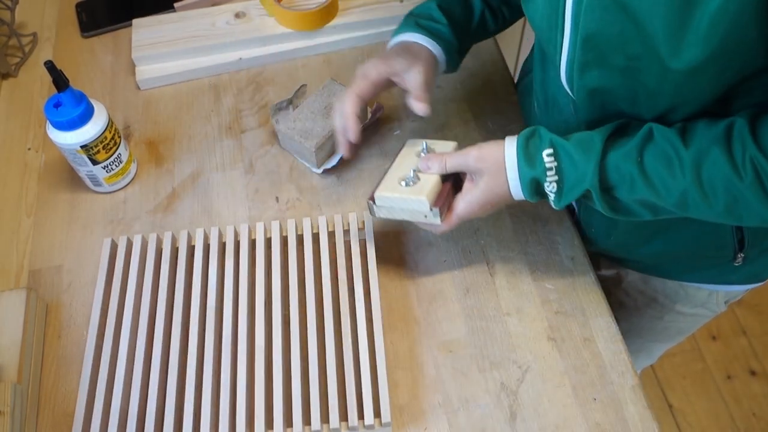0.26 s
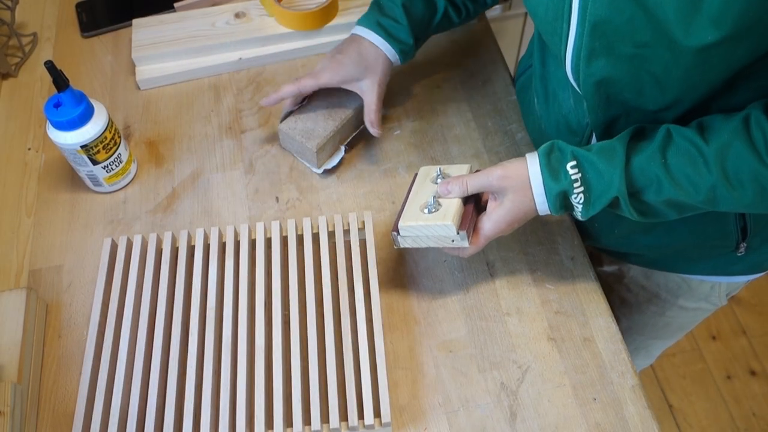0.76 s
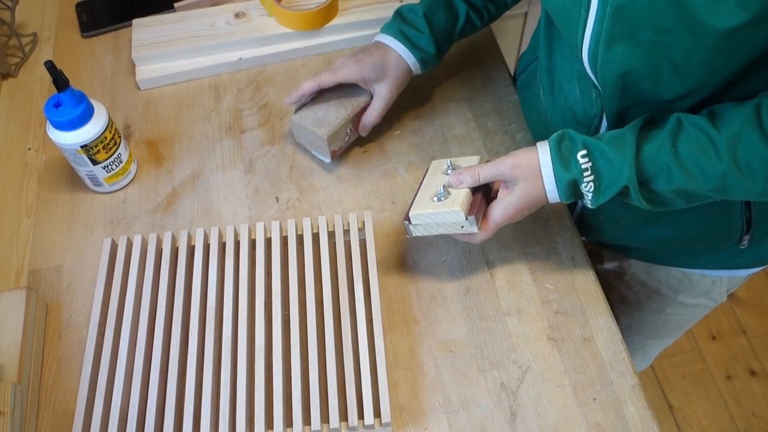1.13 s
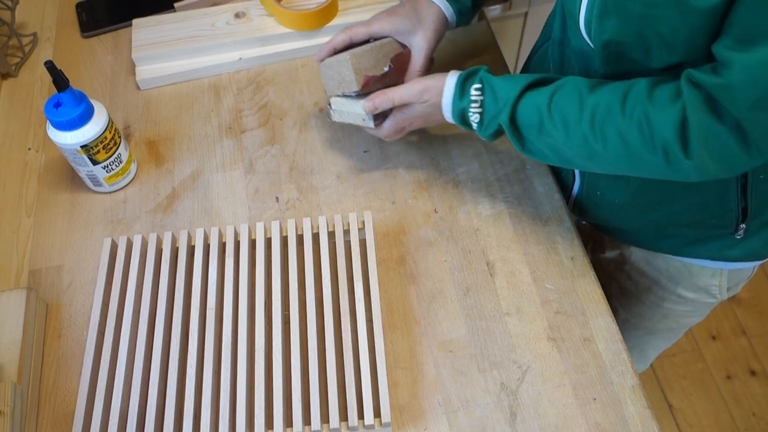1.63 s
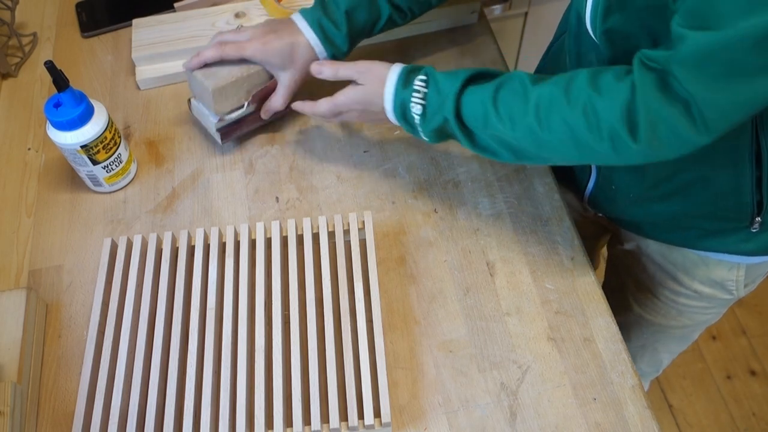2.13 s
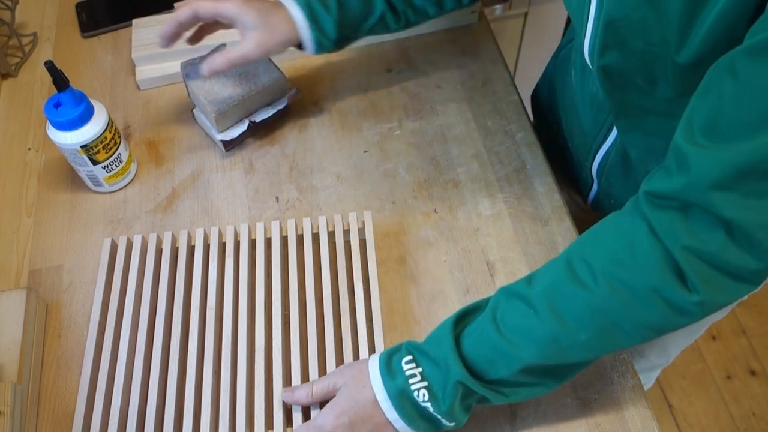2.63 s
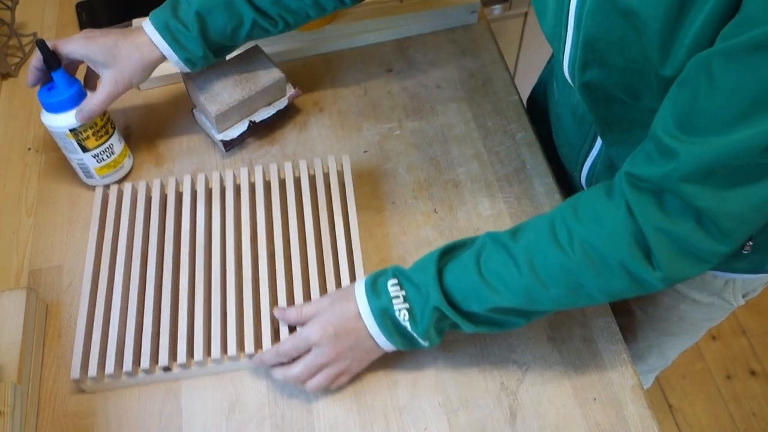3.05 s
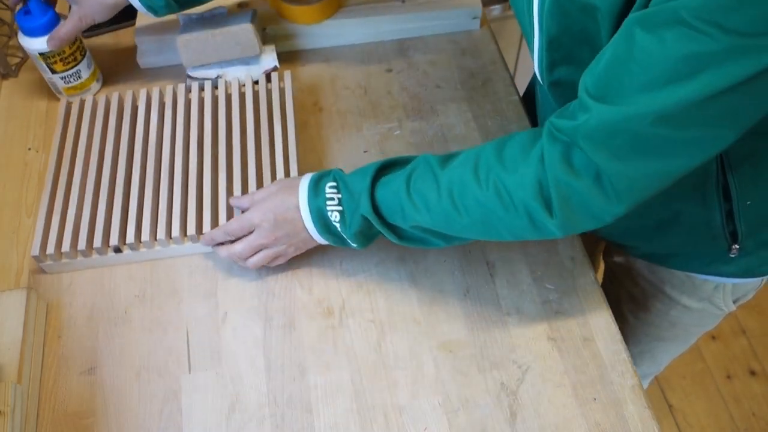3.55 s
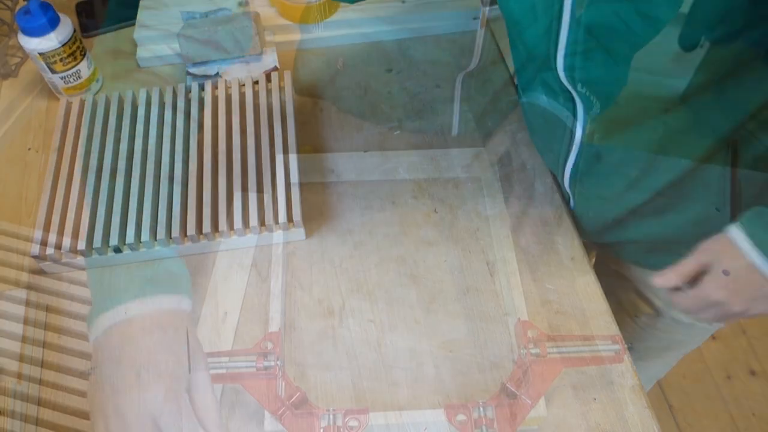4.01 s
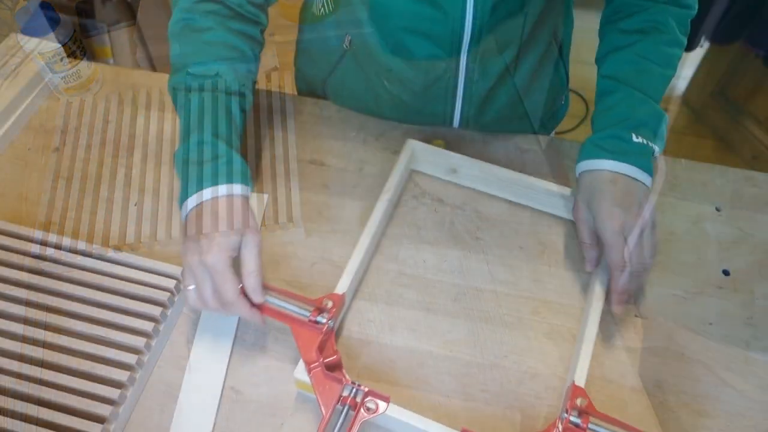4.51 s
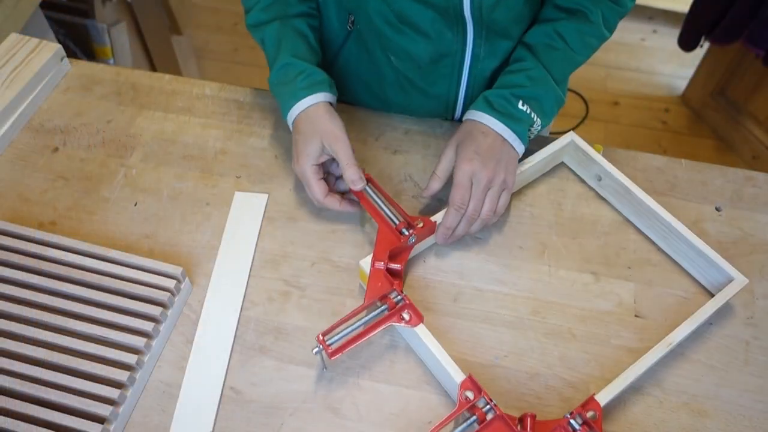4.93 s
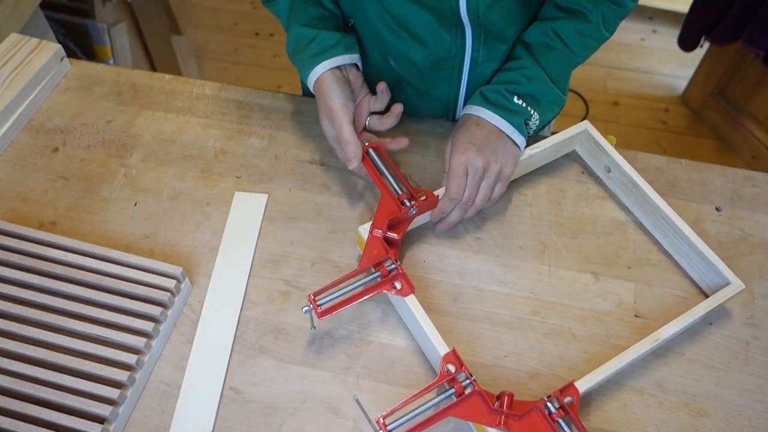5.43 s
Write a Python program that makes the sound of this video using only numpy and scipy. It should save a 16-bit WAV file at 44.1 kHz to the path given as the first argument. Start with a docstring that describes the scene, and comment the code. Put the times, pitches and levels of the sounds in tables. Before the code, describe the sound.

Close stereo sound at a wooden workbench in a small room with short echoes and faint steady hush. First come light abrasive wipes and dry clacks, then a heavy knock. Slats are pushed with a loud juddering scrape of over half a second. Finally, slightly right, a clamped frame drags coarsely, bumps, and gives bright metallic clinks.

```python
"""A wooden frame held in metal corner clamps is dragged round on a bench, knocking, its clamp screws clinking.
Before it, sanding blocks are wiped and put down, and a grille of thin slats is pushed, rasping and juddering.
Small workshop, two microphones: blocks and grille lie a little to the left, the frame a little to the right.
Rubbing is made of tiny random slips that ring a filtered body; blows are dying noise through wooden bodies
and decaying sines for the metal. Echoes and a steady hush make the room."""
import sys
import numpy as np
from scipy import signal
from scipy.fft import rfft, irfft
from scipy.io import wavfile

SR = 44100
rng = np.random.default_rng(int(sys.argv[2]) if len(sys.argv) > 2 else 0)


def wav_out(sig):
    """Save sig, one row per channel (or a flat mono array), as 16-bit PCM at SR to the path in sys.argv[1]."""
    wavfile.write(sys.argv[1], SR, np.round(np.clip(np.atleast_2d(sig).T, -1, 1) * 32767).astype(np.int16))


N = 250047
T = np.arange(N) / SR  # seconds


def from_db(db):
    """Decibels to gain."""
    return np.exp(np.asarray(db) * (np.log(10) / 20))


def rms_one(x):
    """Scale to rms 1."""
    return x / np.sqrt(np.mean(x ** 2) + 1e-20)


def gains(rows):
    """One gain curve for each dB column, practically silent outside the rows."""
    s, *columns = np.transpose(rows)
    out = np.zeros((len(columns), N))
    span = slice(*np.searchsorted(T, [s[0], s[-1]]))
    out[:, span] = [from_db(np.interp(T[span], s, column)) for column in columns]
    return out + 1e-12


def through(x, response):
    """Pass a signal through an impulse response."""
    return signal.oaconvolve(x, response)[:len(x)]


def cut(x, hz, kind, order=2):
    """Butterworth filter."""
    edges = np.clip(hz, 10, .45 * SR)
    return signal.sosfilt(signal.butter(order, edges, kind, fs=SR, output="sos"), x)


def body(colour, modes=(), size=8192):
    """Causal impulse response of a broad colour with resonances on top."""
    hz = np.arange(size // 2 + 1) * SR / size
    points = np.array(colour)
    db = np.interp(np.log(hz + 1), np.log(points[:, 0]), points[:, 1])
    # resonances lift the power
    lift = 1 + sum((from_db(2 * up) - 1) / (1 + (2 * (hz - centre) / width) ** 2)
                   for centre, width, up in modes)
    # folding the cepstrum gives minimum phase: the body answers at once
    cepstrum = irfft(np.log(from_db(db) * np.sqrt(np.maximum(lift, 1e-2))))
    cepstrum[1:size // 2] *= 2
    cepstrum[size // 2 + 1:] = 0
    return irfft(np.exp(rfft(cepstrum)))


def drift(rate):
    """Smooth chance with spread 1, changing about rate times a second."""
    return rms_one(np.interp(T * rate, np.arange(N), rng.standard_normal(N)))


def dying_noise(t60, size=16384):
    """Countless overlapping modes or echoes fading together, 60 dB in t60 seconds; energy 1."""
    tail = rng.standard_normal(size) * from_db(-60 * T[:size] / t60)
    return tail / np.linalg.norm(tail)


def add(out, s, sound):
    """Mix a sound in at a time in seconds."""
    at = max(round(s * SR), 0)
    out[at:at + len(sound)] += sound[:N - at]


def blow(sound, db):
    """Give a blow the energy of one millisecond at this level."""
    return from_db(db) * sound * np.sqrt(SR / 1000) / np.linalg.norm(sound)


def stroke(s, length_s, rise, fall, sag=0):
    """Gain of one hand movement: it swells, holds or sags, and dies away; slopes in dB per second."""
    swell = -rise * np.maximum(s - T, 0)
    hold = -sag * np.clip(T - s, 0, length_s)
    fade = -fall * np.maximum(T - s - length_s, 0)
    return from_db(np.maximum(swell + hold + fade, -200))


def strokes(rows, rise, fall):
    """Like movements, the strongest prevailing: one gain curve for each dB column."""
    out = 0
    for s, length_s, *db in rows:
        out = np.maximum(out, from_db(db)[:, None] * stroke(s, length_s, rise, fall))
    return out


def friction(per_s, spread_db, hiss_db, chatter_db, chatter_rate):
    """Fibres catch and let go: uneven tiny slips over a fine hiss, bunched as the part chatters."""
    sizes = from_db(spread_db * np.minimum(rng.exponential(1, N), 4)) * rng.choice([-1, 1], N)
    slips = rms_one(sizes * (rng.random(N) < per_s / SR))
    hiss = from_db(hiss_db) * rng.standard_normal(N)
    return (slips + hiss) * from_db(chatter_db * drift(chatter_rate))


def slide(slips, response, rumble, rasp, grit, low_hz, high_hz):
    """Slips ring a body: weight brings out its rumble, speed its rasp, dust its grit."""
    x = through(slips, response)
    low = cut(x, low_hz, "low", order=4)
    middle = cut(x, [low_hz, high_hz], "band", order=4)
    high = cut(x, high_hz, "high", order=4)
    return rms_one(low) * rumble + rms_one(middle) * rasp + rms_one(high) * grit


def stick_slip(hz, width_hz):
    """Slips lock on to one resonance and make a wavering tone."""
    r = np.exp(-np.pi * width_hz / SR)
    resonance = [1, -2 * r * np.cos(2 * np.pi * hz / SR), r * r]
    tone = signal.lfilter([1, 0, -1], resonance, rng.standard_normal(N))
    flattened = np.tanh(2 * rms_one(tone))
    return rms_one(cut(flattened, [hz * .8, hz * 1.2], "band"))


def ringing(modes):
    """Fine slips keep a set of narrow resonances sounding."""
    slips, out = rng.standard_normal(N), 0
    for hz, width_hz, db in modes:
        out = out + from_db(db) * cut(slips, [hz - width_hz / 2, hz + width_hz / 2], "band", order=1)
    return rms_one(out)


# Hush of the empty workshop. Each row: frequency in Hz, relative level in dB per Hz.
HUSH_COLOUR = [(20, -42), (40, 5), (58, -4), (110, -4), (190, -12.5), (260, -8.5), (420, -10), (530, -15.5),
               (640, -9), (900, -8), (1080, -16.5), (1380, -17.5), (1560, -9), (2100, -14), (3500, -25),
               (6000, -29), (11000, -28.5), (16000, -24.5)]
# How far the two microphones disagree. Each row: frequency in Hz, side against mid in dB.
STEREO_WIDTH = [(60, -20), (140, -57), (300, -19), (1000, -10), (2200, -12.5), (4000, 1.5), (16000, -2.5)]
HUSH_DB = -51.5


def background():
    """Steady filtered noise, partly different at the two microphones."""
    mid, side = (rms_one(through(rng.standard_normal(N), body(HUSH_COLOUR))) for _ in range(2))
    side = through(side, body(STEREO_WIDTH))
    return from_db(HUSH_DB) * np.array([mid + side, mid - side])


ROOM_T60_S, ROOM_DB, EARLY_DB = 0.3, -7.5, 0


def workshop(x, early_t60=0.025, thin_hz=260):
    """Near surfaces and then the walls answer a blow; the echoes differ between the two microphones."""
    def echoes():
        # near surfaces answer after 1.25 ms, walls after 10 ms
        early = np.roll(np.pad(dying_noise(early_t60), (0, SR // 100)), SR // 800)
        late = np.pad(dying_noise(ROOM_T60_S), (SR // 100, 0))
        return from_db(EARLY_DB) * early + from_db(ROOM_DB) * late
    mid = x + through(x, cut(echoes(), thin_hz, "high"))
    side = through(x, through(echoes(), body(STEREO_WIDTH)))
    return np.array([mid + side, mid - side]) / np.sqrt(1 + from_db(2 * EARLY_DB) + from_db(2 * ROOM_DB))


SCRAPE_ROOM_DB = -6  # walls against the direct scrape


def moving(source, pan_db, lag_s):
    """A sliding part touches at many points, so part of its sound differs between the two microphones."""
    mid, side = source(), through(source(), body(STEREO_WIDTH))
    walls = cut(np.pad(dying_noise(ROOM_T60_S), (SR // 200, 0)), 310, "high")
    mid = mid + from_db(SCRAPE_ROOM_DB) * through(mid, walls)
    # from one side, long waves arrive late at the far microphone and short ones are shadowed
    hz = np.arange(N // 2 + 1) * SR / N
    delay = -1j * np.pi * hz * lag_s / (1 + (hz / 2500) ** 4)
    shadow = (from_db(pan_db / 2) - 1) * hz ** 2 / (hz ** 2 + 600 ** 2)
    side = side + irfft(rfft(mid) * (delay + shadow), N)
    return np.array([mid + side, mid - side])


# Colour of wood being rubbed. Each row: frequency in Hz, relative level in dB per Hz.
RUBBED_WOOD_COLOUR = [(88, -22), (150, -14), (244, -17), (376, -9), (439, -6), (1140, -14), (1940, 2),
                      (2650, 1), (3420, -0.5), (4760, -15.5), (6510, 0), (10200, 1.5), (16000, -8.5)]
# Resonances of a hand-sized block. Each row: frequency in Hz, width in Hz, lift in dB.
BLOCK_RESONANCES = [(465, 15, 1.6), (875, 51, 4.2), (2026, 25, 5), (2380, 90, 1.3), (3290, 330, 1.8)]
# Wipes of sanding blocks and hands over wood.
# Each row: start in seconds, length in seconds, rasp level in dB, grit against rasp in dB.
WIPE_STROKES = [(0.216, 0.022, -46.5, -2.5), (0.65, 0.21, -62, -9), (0.834, .03, -45, -1.5),
                (0.877, 0.062, -35, -1), (0.967, 0.094, -37, 0), (1.109, .025, -44.5, -3),
                (1.18, 0.36, -58, -3.5), (1.483, 0.012, -32, -7), (1.55, 0.012, -38, -4.5),
                (1.586, 0.037, -44.5, 0.5), (1.676, 0.12, -50.5, -3.5), (1.792, 0.076, -43.5, -7),
                (1.88, .15, -52.5, 1), (2.08, 0.31, -59, -2), (2.515, .008, -38.5, -18),
                (2.62, 0.09, -53, -4.5), (3.82, 0.087, -66, 5.5), (4.116, 0.2, -53, -9)]
WIPE_RISE_DB_PER_S, WIPE_FALL_DB_PER_S = 529, 336
# the block's hollow note: level at full rasp; share of the rasp's swing
WIPE_HOLLOW_DB, WIPE_HOLLOW_FOLLOWS = -30, 0.51


def sanding_blocks():
    """Abrasive paper brushes the bench and the other block; fingers brush the wood."""
    slips = friction(per_s=3000, spread_db=1.0, hiss_db=4.5, chatter_db=1.5, chatter_rate=90)
    rows = [(s, length_s, db, db + grit_db) for s, length_s, db, grit_db in WIPE_STROKES]
    rasp, grit = strokes(rows, WIPE_RISE_DB_PER_S, WIPE_FALL_DB_PER_S)
    hollow = from_db(WIPE_HOLLOW_DB) * rasp ** WIPE_HOLLOW_FOLLOWS
    wood = body(RUBBED_WOOD_COLOUR, BLOCK_RESONANCES)
    return slide(slips, wood, hollow, rasp, grit, low_hz=1170, high_hz=4700)


# Colour of a small struck block. Each row: frequency in Hz, relative level in dB per Hz.
STRUCK_BLOCK_COLOUR = [(100, -21), (400, -1.5), (900, -14.5), (1500, -9.5), (2400, 1.5), (3400, -15.5),
                       (5000, -24), (8000, -17.5), (16000, -31)]
# Blocks and slats clacking.
# Each row: time in seconds, level in dB before the common trim, extra edge in dB.
WOOD_CLACKS = [(0.191, -15, -12), (0.198, -16, -3), (0.863, -21.5, 24), (1.0724, -13, 34),
               (1.4735, -8.5, -15), (1.483, -8.5, -27), (1.489, -12, -10), (1.659, -19, 26),
               (2.226, -7.5, -42), (2.2325, -9, -24), (2.482, -28, -23), (4.349, -13, -20),
               (5.352, -22, -12), (5.441, -13.5, -17)]


def clacks(t60=0.011, edge_hz=5000, level_db=-2.56):
    """Small pieces of wood ring briefly; a sharp edge adds a tick."""
    out, block = np.zeros(N), body(STRUCK_BLOCK_COLOUR, BLOCK_RESONANCES)
    for s, db, edge_db in WOOD_CLACKS:
        ring = through(dying_noise(t60), block)
        tick = from_db(edge_db) * cut(ring, edge_hz, "high", order=1)
        add(out, s, blow(ring + tick, db + level_db))
    return out


# Colour of the bench top. Each row: frequency in Hz, relative level in dB per Hz.
BENCH_TOP_COLOUR = [(30, -19), (70, -7.5), (115, -14.5), (165, -0.5), (260, -10), (450, -1), (750, -3.5),
                    (1100, -6.5), (1600, -9), (2500, -11.5), (4000, -22), (9000, -24), (16000, -17)]
# Resonances of the bench top. Each row: frequency in Hz, width in Hz, lift in dB.
BENCH_RESONANCES = [(160, 66, 5), (205, 8.5, 7), (278, 30, 7.5), (380, 26, 3.5), (445, 20, 3), (620, 43, 2),
                    (760, 54, 3.5), (963, 49, 5.5), (1203, 68, 2), (1880, 120, -2)]
# Blows that shake the bench.
# Each row: time in seconds, level in dB before the common lift, contact hardness as a treble limit in Hz.
BENCH_THUDS = [(0.001, -5, 1530), (0.193, -31, 1520), (0.525, -37, 130), (1.475, -24.5, 2000),
               (2.236, 1, 4960), (2.246, -3, 3000), (2.258, -2, 3000), (2.273, -1, 3320), (2.297, -4, 3180),
               (2.48, -29, 900), (2.628, -22, 307), (2.915, -6.5, 300), (3.436, -8.5, 2500),
               (3.563, -18, 247), (4.294, -17, 253), (4.475, -16, 400), (4.5309, -11, 1500),
               (5.16, -3, 4000), (5.428, -11, 1190)]


def thuds(t60=0.19, level_db=3, push_db=-8):
    """One push and the bench top booms; a soft contact leaves out the treble."""
    out, bench = np.zeros(N), body(BENCH_TOP_COLOUR, BENCH_RESONANCES)
    for s, db, hard_hz in BENCH_THUDS:
        shake = dying_noise(t60)
        shake[0] += from_db(push_db)
        boom = cut(through(shake, bench), hard_hz, "low")
        add(out, s, blow(boom, db + level_db))
    return out


# Colour of the slatted grille. Each row: frequency in Hz, relative level in dB per Hz.
GRILLE_BODY_COLOUR = [(24, -69), (40, -20), (96, -17.5), (144, -2), (231, -8.5), (444, -8), (570, -13.5),
                      (715, -11), (1150, -18), (1480, -10.5), (1630, -8.5), (2500, -10), (4800, -43),
                      (7930, -33), (16000, -46.5)]
# Resonances of the slats. Each row: frequency in Hz, width in Hz, lift in dB.
SLAT_RESONANCES = [(144, 67, 4.9), (328, 30, 4.7), (458, 23, 8), (687, 20, 7), (1690, 39, 6),
                   (1854, 74, 7.3), (1920, 130, 8.3), (2340, 22, 8.5), (2514, 55, 5.3), (3224, 48, 8),
                   (3590, 40, 8.4), (4220, 250, 5.3)]
# Resonances of a glue bottle pushed along with the grille. Each row: frequency in Hz, width in Hz, relative
# level in dB.
BOTTLE_RESONANCES = [(1260, 21, 2), (1327, 26, 12.5), (1960, 14, -14), (2200, 29, 10.5), (2430, 9.4, -13),
                     (2520, 22, -17), (4140, 41, -16), (5320, 45, -22), (7650, 410, -13.5)]
# Slats catching and slipping in step. Each row: start in seconds, length in seconds, level in dB.
SLAT_JUDDERS = [(3.01, 0.056, -14), (3.17, 0.022, -12), (3.35, 0.033, -17)]
# Squeaks as the grille is gripped. Each row: start in seconds, length in seconds, level in dB.
GRIP_SQUEAKS = [(2.634, 0.0069, -35.5), (2.667, .011, -34)]
# one push of the grille: it gets up to speed, eases off steadily and stops
PUSH_START_S, PUSH_LENGTH_S, PUSH_DB = 2.8944, 0.62, -14.5
PUSH_RISE_DB_PER_S, PUSH_SAG_DB_PER_S, PUSH_FALL_DB_PER_S = 231, 6, 178
PUSH_RUMBLE_DB, PUSH_GRIT_DB = -6.5, -15.5  # against the rasp
# early in the push a glue bottle, shoved along with the grille, rings brightly
BOTTLE_START_S, BOTTLE_LENGTH_S, BOTTLE_DB, BOTTLE_FALL_DB_PER_S = 2.91, 0.092, -18, 110
JUDDER_HZ, JUDDER_WIDTH_HZ, JUDDER_RISE_DB_PER_S, JUDDER_FALL_DB_PER_S = 1658, 28, 160, 170
SQUEAK_HZ, SQUEAK_WIDTH_HZ, SQUEAK_FADE_DB_PER_S = 2110, 32, 1100


def grille():
    """Slat ends rasp over the bench and now and then judder in step."""
    slips = friction(per_s=1200, spread_db=1.5, hiss_db=0.5, chatter_db=1.9, chatter_rate=190)
    push = from_db(PUSH_DB) * stroke(PUSH_START_S, PUSH_LENGTH_S, PUSH_RISE_DB_PER_S,
                                     PUSH_FALL_DB_PER_S, PUSH_SAG_DB_PER_S)
    rumble, grit = push * from_db(PUSH_RUMBLE_DB), push * from_db(PUSH_GRIT_DB)
    slats = body(GRILLE_BODY_COLOUR, SLAT_RESONANCES)
    scrape = slide(slips, slats, rumble, push, grit, low_hz=1120, high_hz=4530)
    bearing = stroke(BOTTLE_START_S, BOTTLE_LENGTH_S, PUSH_RISE_DB_PER_S, BOTTLE_FALL_DB_PER_S)
    bottle = from_db(BOTTLE_DB) * bearing * ringing(BOTTLE_RESONANCES)
    judder_gain = strokes(SLAT_JUDDERS, JUDDER_RISE_DB_PER_S, JUDDER_FALL_DB_PER_S)[0]
    judder = judder_gain * stick_slip(JUDDER_HZ, JUDDER_WIDTH_HZ)
    squeak_gain = strokes(GRIP_SQUEAKS, SQUEAK_FADE_DB_PER_S, SQUEAK_FADE_DB_PER_S)[0]
    squeak = squeak_gain * stick_slip(SQUEAK_HZ, SQUEAK_WIDTH_HZ)
    return scrape + bottle + judder + squeak


# Modes of a clamp's body. Each row: frequency in Hz, level in dB, t60 in seconds, before the grip's chance.
CLAMP_BODY_MODES = [(1530, -9.5, 0.055), (1690, -1, 0.02), (1926, -6, .025), (2224, 3, 0.023),
                    (2470, -11.5, 0.023), (2840, -20, 0.047), (4030, -25, 0.026)]
# Modes of the clamp's loose handle, in the same columns: Hz, dB, seconds.
LOOSE_HANDLE_MODES = [(5830, -21, .015), (6840, -11, 0.018), (8500, -3, 0.016), (9950, 7, 0.022),
                      (9700, 17, 0.0083), (10200, 0, 0.028), (10460, 6, .02), (11000, -11, .015)]
# Clamp screws clinking.
# Each row: time in seconds, body level in dB, handle level in dB, both before the common trims.
SCREW_CLINKS = [(5.1535, -4, -13), (5.157, -3, -7.5), (5.1615, -1, -27), (5.2807, -1, -13.5),
                (5.2835, -3.5, -38), (5.3525, -11, -37), (5.441, -25, -30), (5.606, -36, -22),
                (5.611, -18, -17)]


def clinks(contact_s=0.012, contact_db=-3, crack_s=0.028, crack_db=-8, level_db=-4.5, size=8192):
    """Each touch cracks and rings clamp and handle; the grip shifts every mode's strength and pitch a little."""
    out, t = np.zeros(N), T[:size]
    for s, *levels in SCREW_CLINKS:
        for modes, db in zip((CLAMP_BODY_MODES, LOOSE_HANDLE_MODES), levels):
            # spreads: strength in dB, detuning as a fraction, phase in radians
            chance = rng.normal(0, (2.5, .015, 2), (len(modes), 3))
            ring = np.zeros(size)
            for (hz, level, t60), (up, detune, phase) in zip(modes, chance):
                fade = from_db(level + up - 60 * t / t60)
                ring += fade * np.sin(2 * np.pi * hz * (1 + detune) * t + phase)
            ring = ring * np.minimum(t * 3000, 1)  # onset of a third of a millisecond
            contact = from_db(contact_db) * through(ring, dying_noise(contact_s))
            add(out, s, blow(ring + contact, db + level_db))
        crack = cut(dying_noise(crack_s), [2500, 11000], "band", order=3)
        add(out, s, blow(crack, levels[1] + crack_db))
    return out


# Colour of the clamped frame. Each row: frequency in Hz, relative level in dB per Hz.
FRAME_BODY_COLOUR = [(24, -104), (40, -27), (96, -19.5), (140, 3), (243, -13.5), (283, -6), (585, -19),
                     (1040, -13.5), (1340, -16), (2440, -14.5), (3220, -26.5), (3740, -29.5), (4680, -30.5),
                     (9450, -24), (16000, -34)]
# Resonances of the frame. Each row: frequency in Hz, width in Hz, lift in dB.
FRAME_RESONANCES = [(141, 28, 6.8), (358, 240, 4.9), (710, 100, 6.4), (1020, 80, 2.1), (1500, 26, 9.9),
                    (1658, 84, 7), (2064, 63, 7.4), (1330, 82, 1.5), (2423, 92, 6.5), (2826, 61, 6.4),
                    (3730, 83, 10.3)]
# Resonances of the frame's rails. Each row: frequency in Hz, width in Hz, relative level in dB.
RAIL_RESONANCES = [(801, 30, 6.5), (1032, 36, 6.5), (1103, 11, 12.5)]
# The frame dragged round.
# Each row: time in seconds, the wood's rasp in dB, the bench's rumble in dB, the grit in dB.
DRAG_LEVELS = [(4.296, -34.5, -31, -49), (4.328, -27, -31.5, -41.5), (4.452, -30.5, -26.5, -39),
               (4.48, -17.5, -21, -29.5), (4.516, -26, -25.5, -41), (4.534, -24, -27, -35.5),
               (4.646, -23.5, -20.5, -38), (4.69, -22, -26, -32), (4.886, -21.5, -26, -36.5),
               (4.968, -25.5, -29.5, -42.5), (5.066, -19.5, -33, -28), (5.11, -17.5, -20.5, -36.5),
               (5.14, -39, -21, -38.5)]
# Last nudges as the frame is lined up.
# Each row: start in seconds, length in seconds, rasp in dB, rumble in dB.
LAST_NUDGES = [(5.173, .02, -24.5, -29.5), (5.243, .01, -33, -29.5), (5.36, .04, -36, -56),
               (5.46, 0.024, -40.5, -40), (5.57, .1, -38.5, -43.5)]
# The rails sing during the drag. Each row: start in seconds, length in seconds, level in dB.
RAIL_SONG = [(4.31, 0.53, -30), (4.535, 0.016, -18.5)]
NUDGE_RISE_DB_PER_S, NUDGE_FALL_DB_PER_S = 397, 110
NUDGE_GRIT_DB = -15.5  # against the rasp
RAIL_RISE_DB_PER_S, RAIL_FALL_DB_PER_S = 1000, 152


def frame():
    """The heavy clamped frame grinds round in coarse slips and makes the bench top drone."""
    slips = friction(per_s=600, spread_db=2.5, hiss_db=-4, chatter_db=1.5, chatter_rate=70)
    nudges = [(s, length_s, db, rumble_db, db + NUDGE_GRIT_DB) for s, length_s, db, rumble_db in LAST_NUDGES]
    nudge_gains = strokes(nudges, NUDGE_RISE_DB_PER_S, NUDGE_FALL_DB_PER_S)
    rasp, rumble, grit = gains(DRAG_LEVELS) + nudge_gains
    wood = body(FRAME_BODY_COLOUR, FRAME_RESONANCES)
    grind = slide(slips, wood, rumble, rasp, grit, low_hz=516, high_hz=4680)
    rail_gain = strokes(RAIL_SONG, RAIL_RISE_DB_PER_S, RAIL_FALL_DB_PER_S)[0]
    return grind + rail_gain * ringing(RAIL_RESONANCES)


def scene():
    """Everything on the bench, heard in the room."""
    # positive pan is to the left; lag is how late the left microphone hears it
    scrapes = moving(sanding_blocks, pan_db=.9, lag_s=-4e-5)
    scrapes = scrapes + moving(grille, pan_db=.8, lag_s=-6e-5)
    scrapes = scrapes + moving(frame, pan_db=-.8, lag_s=5e-5)
    blows = workshop(thuds() + clacks() + clinks())
    return scrapes + blows + background()


# Treble colour of the two microphones. Each row: frequency in Hz, left minus right in dB.
MICROPHONE_BALANCE = [(1200, 0.9), (2400, 0.5), (4200, -6.5), (7500, -2), (14000, -4.5)]
LEVEL_BELOW_HZ = 600  # below this the microphones match
CUTOFF_HZ = 15900


def record(dry, top=1.5):
    """Each microphone has its own treble colour; peaks are rounded and the top is cut."""
    ports = []
    for x, sign in zip(dry, (1, -1)):
        colour = [(LEVEL_BELOW_HZ, 0)] + [(hz, sign * db / 2) for hz, db in MICROPHONE_BALANCE]
        ports.append(through(x, body(colour)))
    rounded = top * np.tanh(np.array(ports) / top)
    steep = signal.ellip(12, .1, 80, CUTOFF_HZ, fs=SR, output="sos")
    return signal.sosfilt(steep, rounded)


dry = scene()
out = record(dry)
wav_out(out)
```